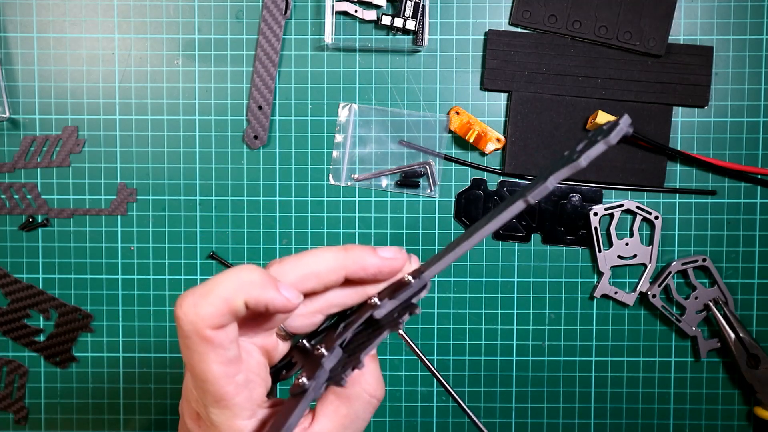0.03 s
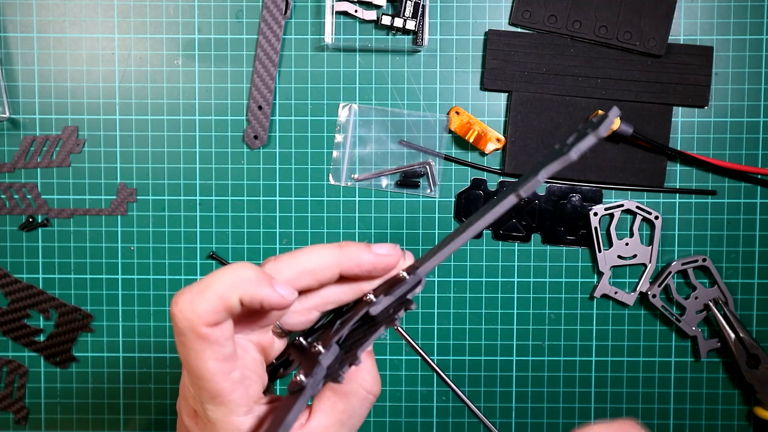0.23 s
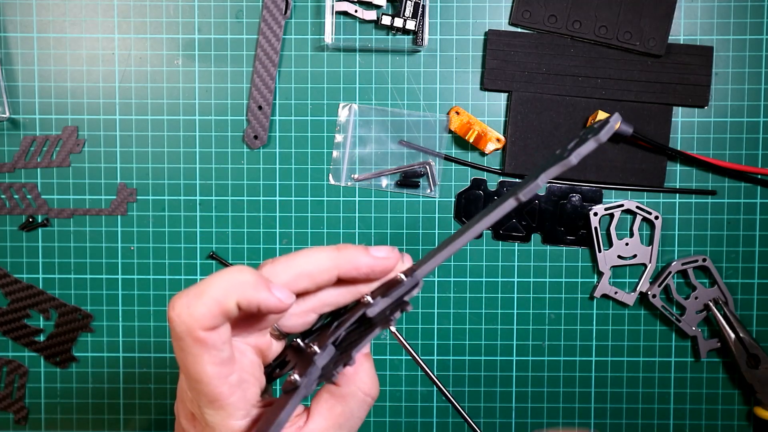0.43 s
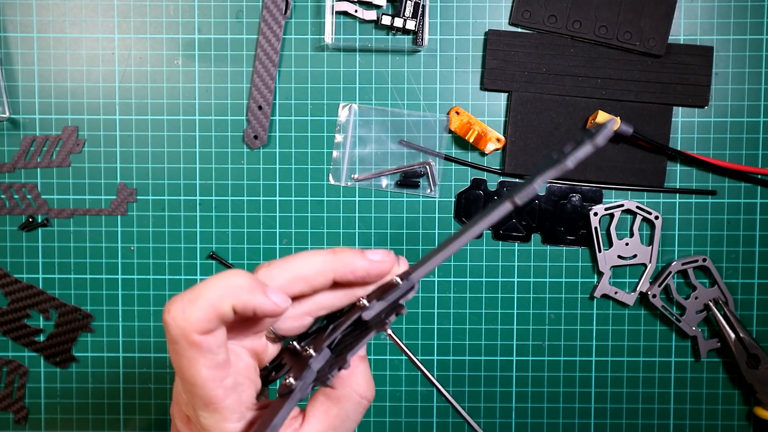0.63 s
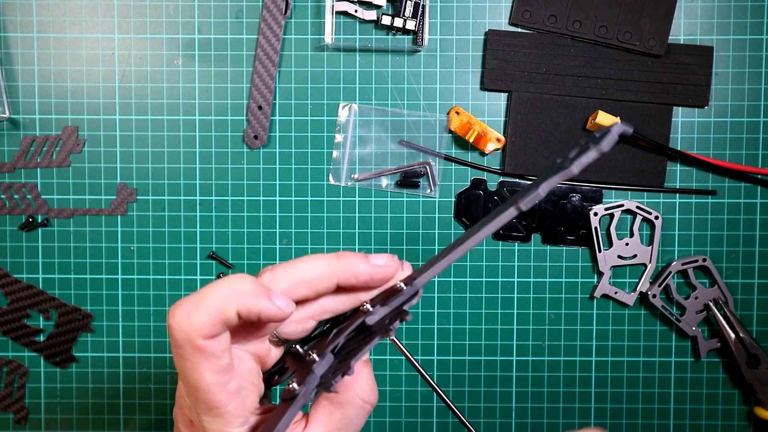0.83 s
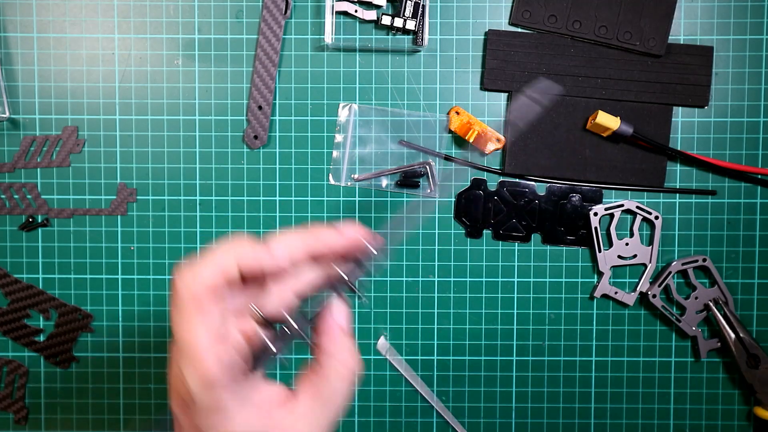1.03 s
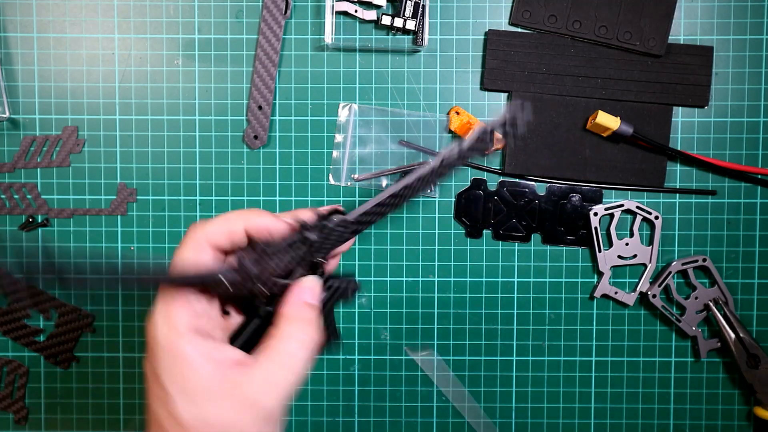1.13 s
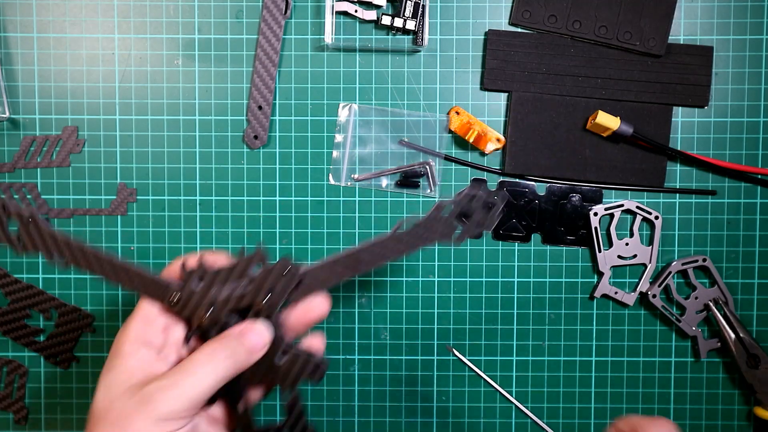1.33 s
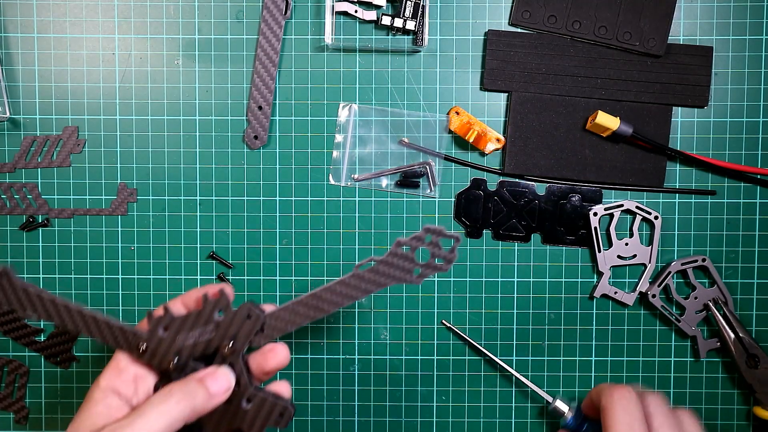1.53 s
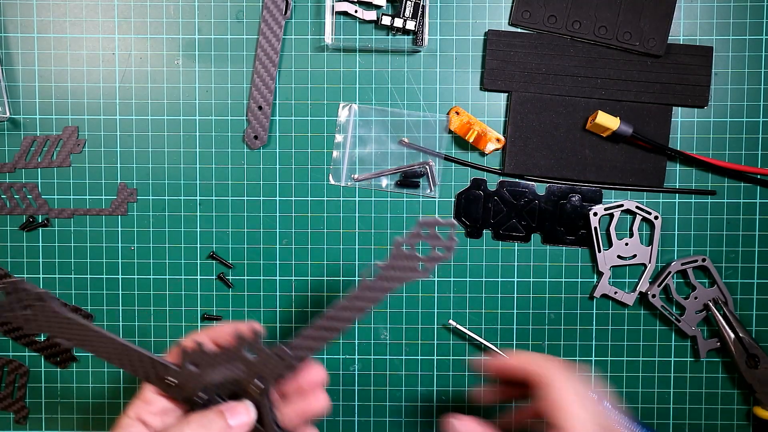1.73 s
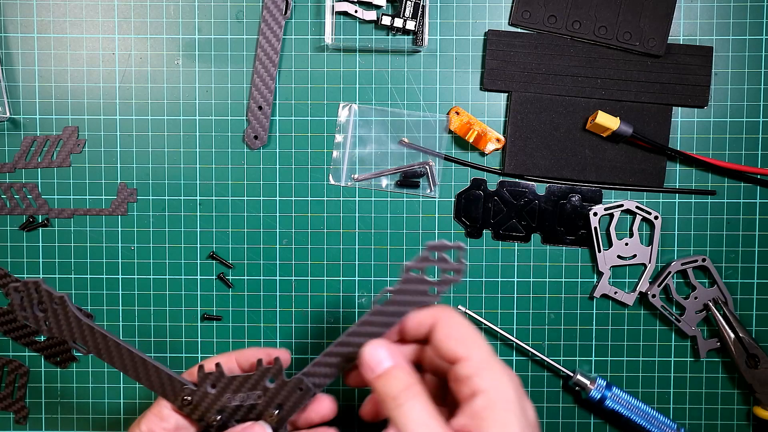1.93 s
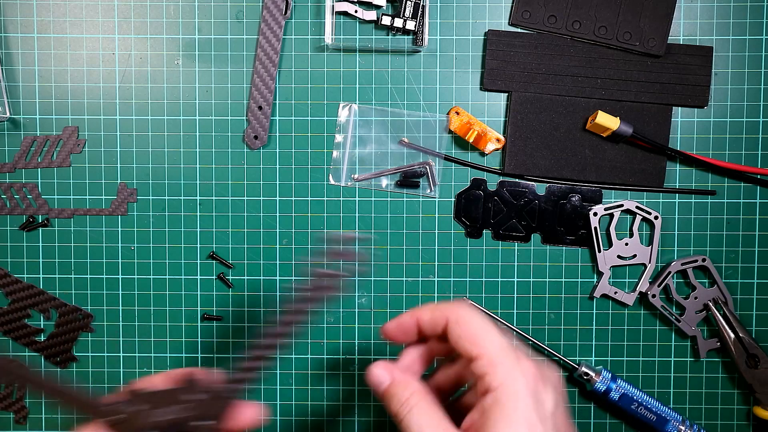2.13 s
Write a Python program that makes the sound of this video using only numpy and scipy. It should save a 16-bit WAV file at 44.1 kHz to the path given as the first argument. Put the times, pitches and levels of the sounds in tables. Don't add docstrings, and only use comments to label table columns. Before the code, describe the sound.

Metal screwdriver set down hard on a workbench: light taps, sharp clack, quick rattling bounces, steady hiss

```python
import sys
import numpy as np
from scipy import signal
from scipy.fft import rfft, irfft
from scipy.io import wavfile
from scipy.ndimage import uniform_filter1d

SR = 44100
rng = np.random.default_rng(int(sys.argv[2]) if len(sys.argv) > 2 else 0)


def boost_factor(decibels):
    exponent = np.asarray(decibels, float) / 20
    return 10 ** exponent


def to_wav(sig):
    pcm = np.clip(np.atleast_2d(sig), -1, 1) * 32767
    pcm = np.round(pcm).astype(np.int16)
    wavfile.write(sys.argv[1], SR, pcm.T)


N = 96005


def decay(t, t60_s):
    return np.exp(-np.log(1000) * t / t60_s)


def ring(start_s, level_db, modes, detune=0., sign=-1):
    out, start = np.zeros(N), int(start_s * SR)
    t = np.arange(min(N - start, SR // 2)) / SR
    luck = rng.standard_normal((16, 2))
    for k, (pitch_hz, mode_db, t60_s) in enumerate(modes):
        pitch_hz = pitch_hz * (1 + detune * luck[k, 1])
        gain = boost_factor(level_db + mode_db + 1.0 * luck[k, 0])
        rise = 1 - np.exp(-t * pitch_hz / 0.16)
        tone = np.sin(2 * np.pi * pitch_hz * t) * decay(t, t60_s)
        out[start:start + len(t)] += sign ** k * gain * tone * rise
    return out


def click(start_s, level_db, pitch_hz, t60_s):
    # share of its pitch [ratio], level_db [dB]
    cluster = [(0.68, -2), (0.998, 2), (1.3, -3), (2.3, -16)]
    modes = [(pitch_hz * share, mode_db, t60_s) for share, mode_db in cluster]
    return ring(start_s, level_db - 6, modes, sign=1)


def band(size, centre_hz, octaves):
    f = np.fft.rfftfreq(size, 1 / SR) + 1
    bell = np.exp(-(np.log2(f / centre_hz) / octaves) ** 2)
    noise = irfft(rfft(rng.standard_normal(size)) * bell, size)
    return noise / noise.std()


def snap(start_s, level_db, centre_hz, octaves, t60_s):
    t = np.clip(np.arange(N) / SR - start_s, 0, None)
    rise = 1 - np.exp(-t * 5000)
    return boost_factor(level_db) * band(N, centre_hz, octaves) * decay(t, t60_s) * rise


def handle_blows():
    # start_s [s], click_db, thud_db, knock_db, clack_db [dB]
    blows = [
        (1.7192, -8, -21.5, -25.5, -34),
        (1.7240, -28, -28, -28, -53),
        (1.7297, -16, -29.5, -29, -25),
        (1.7780, -9.5, -36, -20.5, -29),
        (1.7879, -47, -32, -35.5, -38),
        (1.8026, -15, -34, -34, -26),
        (1.8121, -28, -35, -38, -29),
        (1.8276, -30, -38, -38, -41.5),
        (1.859, -45, -45, -48, -53),
        (2.074, -80, -54, -75, -80),
    ]
    # pitch_hz [Hz], level_db [dB], t60_s [s]
    thud_modes = [(245, -17, 0.02), (321, -3, 0.042), (379, -3.5, 0.0254)]
    # pitch_hz [Hz], level_db [dB], t60_s [s]
    knock_modes = [(460, -18, .03), (603, 0, .042), (738, -10.5, .08)]
    # pitch_hz [Hz], level_db [dB], t60_s [s]
    clack_modes = [(904, -14, .05), (1031, -12.5, 0.061), (1211, -2, 0.036), (1348, 0, 0.017),
                   (1580, -27, 0.017), (2165, -3.5, 0.022)]
    detune = 0.006
    total = np.zeros(N)
    for start_s, click_db, thud_db, knock_db, clack_db in blows:
        total += click(start_s, click_db, 2793, 0.0038)
        total += ring(start_s, thud_db, thud_modes, detune)
        total += ring(start_s, knock_db, knock_modes, detune, sign=1)
        total += ring(start_s, clack_db, clack_modes, detune)
    return total


def tip_taps():
    # start_s [s], low_db, middle_db, high_db, mat_db [dB]
    taps = [
        (1.5884, -31, -46, -38, -36),
        (1.6741, -31, -29, -26, -36),
        (1.7013, -36, -40, -44, -58),
    ]
    # pitch_hz [Hz], level_db [dB], t60_s [s]
    low_modes = [(2530, 0, .018), (1800, -15, .02), (6850, -16, .02), (3640, -5, .016)]
    # pitch_hz [Hz], level_db [dB], t60_s [s]
    middle_modes = [(3150, 0, .02), (3316, -13, .08), (2982, -16, .09)]
    # pitch_hz [Hz], level_db [dB], t60_s [s]
    high_modes = [(4210, 0, .016), (5000, -19, .014), (5600, -12, .014), (7600, -14, .012),
                  (11900, -22, .02)]
    # pitch_hz [Hz], level_db [dB], t60_s [s]
    mat_modes = [(1020, 0, .05), (1120, -9, .05), (700, -11, .05)]
    # pitch_hz [Hz], level_db [dB], t60_s [s]
    slap_modes = [(1206, -9, .09), (1270, -0.5, .025), (1500, -10, 0.068)]
    total = ring(1.5912, -34.5, slap_modes)
    for start_s, low_db, middle_db, high_db, mat_db in taps:
        total += ring(start_s, low_db, low_modes)
        total += ring(start_s, middle_db, middle_modes)
        total += ring(start_s, high_db, high_modes)
        total += ring(start_s + 0.003, mat_db, mat_modes)
    return total


def ringing_steel():
    # start_s [s], handle_db, bend_db, shaft_db, tip_db [dB]
    strikes = [
        (1.5885, -51, -47, -72, -77),
        (1.6738, -53, -57, -55, -49.5),
        (1.7012, -48, -72, -64, -59),
        (1.7190, -41.5, -67, -71, -67),
        (1.7295, -33, -56, -57, -64),
        (1.7780, -50.5, -65, -63, -62),
        (1.8030, -33.5, -62, -62, -54),
        (1.8120, -36, -60, -61, -56),
        (1.8560, -90, -75, -64.5, -80),
    ]
    # pitch_hz [Hz], level_db [dB], t60_s [s]
    handle_modes = [(9401, -2, .18)]
    # pitch_hz [Hz], level_db [dB], t60_s [s]
    bend_modes = [(2060, 1, .17)]
    # pitch_hz [Hz], level_db [dB], t60_s [s]
    shaft_modes = [(5396, -2, .4), (10970, -1, .25)]
    # pitch_hz [Hz], level_db [dB], t60_s [s]
    tip_modes = [(9805, 0, .13), (11285, -6, .08), (13300, -10, .07)]
    # pitch_hz [Hz], level_db [dB], t60_s [s]
    held_modes = [(5394, 0, .13), (9394, 0, .05), (11290, -1, .06), (2065, -10, .12)]
    # start_s [s], change_db [dB]
    mutes = [
        (1.634, -9),
        (1.771, -9),
        (1.846, -14),
        (1.861, 12),
    ]
    t = np.arange(N) / SR
    total = np.zeros(N)
    for start_s, handle_db, bend_db, shaft_db, tip_db in strikes:
        mute_db = sum(change_db * np.clip((t - at_s) / 0.004, 0, 1)
                      for at_s, change_db in mutes if at_s > start_s)
        total += boost_factor(mute_db) * ring(start_s, handle_db, handle_modes)
        total += ring(start_s, bend_db, bend_modes)
        total += ring(start_s, shaft_db, shaft_modes)
        total += ring(start_s, tip_db, tip_modes)
    wobble_db = 2.5 * band(N, 30, 1.0)
    leaving_bolt = ring(1.1266, -57, held_modes)
    return total * boost_factor(wobble_db) + leaving_bolt


def bench_booms():
    # start_s [s], level_db [dB]
    booms = [
        (1.590, -52),
        (1.7190, -39),
        (1.7800, -39),
        (1.8100, -42.5),
        (1.87, -56),
        (1.94, -64),
        (1.991, -60.5),
    ]
    # pitch_hz [Hz], level_db [dB], t60_s [s]
    boom_modes = [(89.5, 0, 0.091)]
    return sum(ring(start_s, level_db, boom_modes) for start_s, level_db in booms)


def rattles_and_snaps():
    # start_s [s], level_db [dB], pitch_hz [Hz], t60_s [s]
    ticks = [(.7145, -43, 3000, .007), (.7145, -43, 4750, .006), (.7160, -56, 4200, .03),
             (.7187, -47, 1780, .02), (.7187, -47, 700, .012), (.7187, -52, 1250, .012),
             (.7187, -51, 2400, .01), (.7235, -55, 2800, .012)]
    # start_s [s], level_db [dB], pitch_hz [Hz], t60_s [s]
    rattles = [(1.7165, -42, 2800, .008), (1.7222, -24, 2400, .008), (1.7294, -22, 3800, .007),
               (1.7330, -28, 3200, .008), (1.7355, -30, 3300, .008), (1.7408, -33, 3000, .008),
               (1.7462, -35, 3200, .008), (1.7490, -36, 750, .03), (1.7530, -35, 800, .012),
               (1.7588, -39, 1500, .01), (1.7742, -40, 3000, .008), (1.7812, -25, 2300, .008),
               (1.7886, -29, 2700, .008), (1.7948, -36, 3000, .008), (1.8044, -26, 1500, .008),
               (1.8072, -30, 3000, .008), (1.8120, -36, 4700, .007), (1.8162, -35, 2500, .008),
               (1.8232, -36, 2800, .008), (1.8272, -29, 2400, .008), (1.8302, -32, 700, .015),
               (1.8368, -31, 600, .02), (1.8430, -38, 900, .012), (1.8510, -37, 650, .015),
               (1.8528, -40, 3200, .008), (1.8615, -38, 620, .02), (1.8668, -39, 600, .015)]
    # start_s [s], level_db [dB], centre_hz [Hz], spread [octaves], t60_s [s]
    snaps = [(1.3098, -44, 9500, 1., .015), (1.3110, -56, 7500, 1.08, .07), (1.1250, -58, 6200, .5, .015),
             (1.7715, -40.5, 9700, 0.48, .02), (1.7190, -33.5, 7100, 0.53, 0.013),
             (1.7295, -34, 6800, .6, 0.015), (1.8025, -36, 7200, 0.55, .015),
             (1.7780, -40, 6500, 0.67, 0.017), (1.6738, -41.5, 6000, .8, .025),
             (1.5885, -50, 6500, .9, .015), (1.7200, -36, 2400, 0.87, 0.1), (1.7310, -36, 2000, 1.08, 0.13),
             (1.7790, -39, 1800, 1.32, 0.1), (1.8040, -36.5, 2050, 1.08, 0.18),
             (1.8130, -35.5, 625, 0.57, 0.16), (1.8300, -42.5, 350, .25, .15),
             (1.7210, -46, 130, .5, 0.087), (1.8040, -56, 12000, .3, 0.084), (1.5885, -47, 260, 1., .08),
             (1.6740, -56, 400, 1, .06)]
    tones = sum(ring(start_s, level_db, [(pitch_hz, 0, t60_s)])
                for start_s, level_db, pitch_hz, t60_s in ticks + rattles)
    return tones + sum(snap(*row) for row in snaps)


def finger_rubs():
    # start_s [s], length_s [s], level_db [dB], centre_hz [Hz]
    rubs = [(.10, 0.035, -68.5, 5300), (0.45, 0.026, -67.5, 5800), (0.72, 0.041, -72, 5000),
            (1.07, 0.027, -73, 6000), (1.28, 0.26, -75, 460), (0.695, 0.016, -72, 180),
            (2.016, 0.016, -71, 380), (0.635, 0.053, -73, 450), (1.53, 0.033, -72.5, 620)]
    t = np.arange(N) / SR
    sing = boost_factor(-77.5) * np.exp(-((t - 1.3) / 0.25) ** 2) * band(N, 1833, 0.058)
    return sing + sum(boost_factor(level_db) * np.exp(-((t - start_s) / length_s) ** 2) * band(N, centre_hz, 0.8)
                      for start_s, length_s, level_db, centre_hz in rubs)


def room(source):
    # centre_hz [Hz], level_db [dB], t60_s [s]
    answer_bands = [(127, -36, 0.16), (280, -33.5, 0.18), (606, -28, 0.21), (1227, -25, .22),
                    (2340, -23, 0.17), (4630, -24, 0.13), (8000, -20, 0.15), (13000, -23, 0.103)]
    t = np.arange(SR // 2) / SR
    answer = sum(boost_factor(level_db - 24) * band(len(t), centre_hz, 0.77) * decay(t, t60_s)
                 for centre_hz, level_db, t60_s in answer_bands)
    rise = 1 - np.exp(-t / 0.0013)
    return signal.fftconvolve(source, answer * rise)[:N]


def hiss(shape, level_db):
    f = np.fft.rfftfreq(N, 1 / SR) + 1
    hz, colour_db = np.array(shape).T
    colour = boost_factor(np.interp(np.log(f), np.log(hz), colour_db))
    noise = irfft(rfft(rng.standard_normal(N)) * colour, N)
    walk = np.repeat(rng.standard_normal(N // 2000 + 1), 2000)
    flicker_db = 0.6 * uniform_filter1d(walk, 3000)[:N]
    return noise / noise.std() * boost_factor(level_db + flicker_db)


def electronics():
    # pitch_hz [Hz], level_db [dB per Hz]
    mid_colour = [(25, -18), (70, -4.5), (160, -0.5), (500, 2.5), (1500, 1), (4000, -1), (9000, -3.5),
                  (16000, -5.5)]
    # pitch_hz [Hz], level_db [dB per Hz]
    side_colour = [(25, 2), (70, 3), (160, 4.5), (500, 5.5), (1500, -3.5), (4000, -8), (9000, -10),
                   (16000, -11.5)]
    # harmonic [number], level_db [dB rms]
    harmonics = [(1, -85), (3, -79), (5, -81), (7, -86), (9, -88), (11, -86), (13, -86), (19, -89)]
    mains_hz, hum_gain_db, hum_side_db = 50.2, 0.9, -9.5
    t = np.arange(N) / SR
    hum = sum(boost_factor(level_db + hum_gain_db) * np.sin(2 * np.pi * (number * mains_hz * t + rng.random()))
              for number, level_db in harmonics)
    dip = boost_factor(-11 * np.exp(-((t - 1.5815) / 0.0069) ** 4))
    mid = (hiss(mid_colour, -65.5) + hum) * dip
    side = hiss(side_colour, -62) + boost_factor(hum_side_db) * hum
    return mid, side


def scene():
    taps, steel = tip_taps(), ringing_steel()
    near = handle_blows() + bench_booms() + rattles_and_snaps() + finger_rubs()
    to_room = near + boost_factor(-3) * taps + boost_factor(-11) * steel
    heard = near + taps + steel + room(to_room)
    mic_low_cut = signal.butter(2, 70, "high", fs=SR, output="sos")
    mid, side = electronics()
    mid = mid + signal.sosfilt(mic_low_cut, heard)
    return np.array([mid + side, mid - side])


def low_pass(x):
    return signal.sosfilt(signal.butter(12, 16440, fs=SR, output="sos"), x)


def record(dry):
    top_cut = signal.ellip(10, 0.2, 60, 15950, fs=SR, output="sos")
    mix = signal.sosfilt(top_cut, dry) + 0.0001
    return low_pass(mix)


dry = scene()
out = record(dry)
to_wav(out)
```